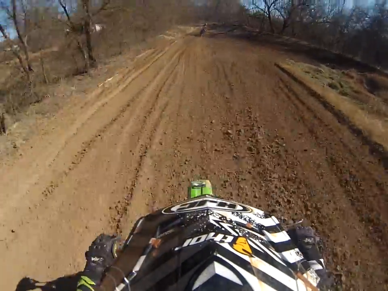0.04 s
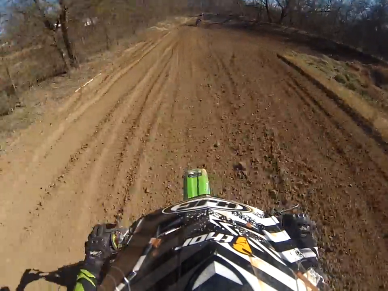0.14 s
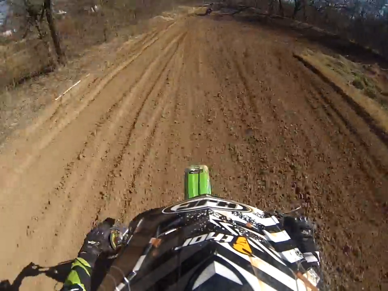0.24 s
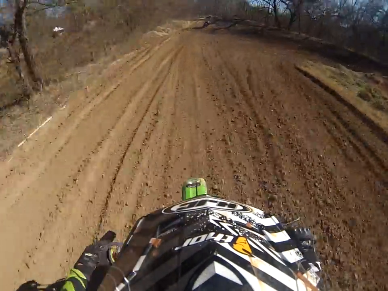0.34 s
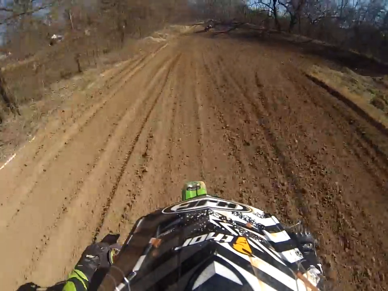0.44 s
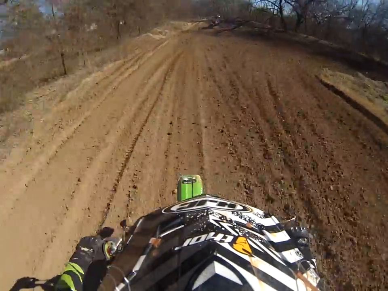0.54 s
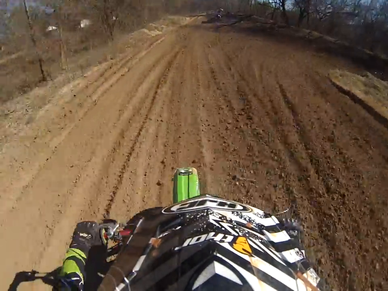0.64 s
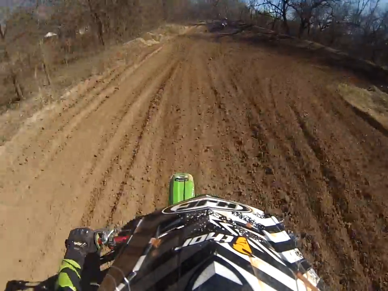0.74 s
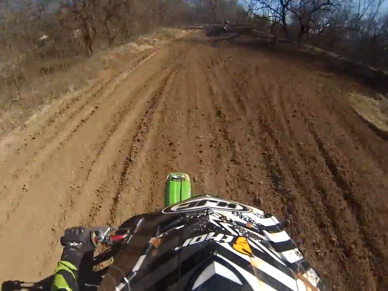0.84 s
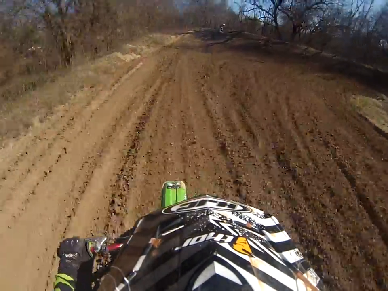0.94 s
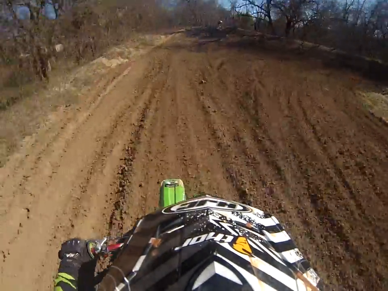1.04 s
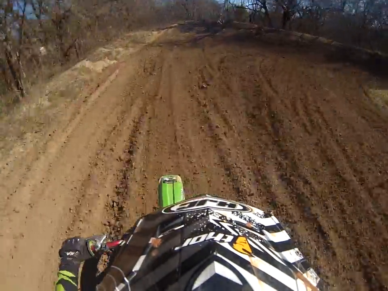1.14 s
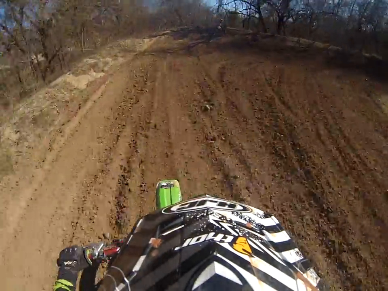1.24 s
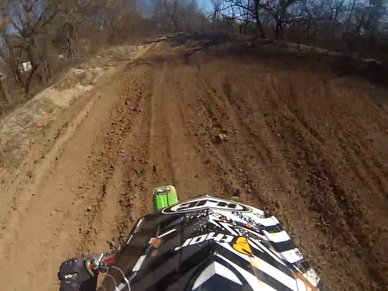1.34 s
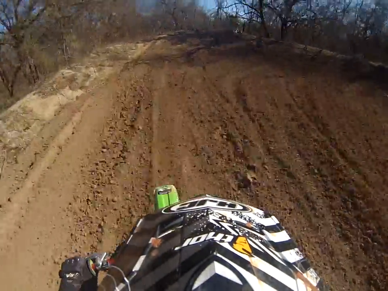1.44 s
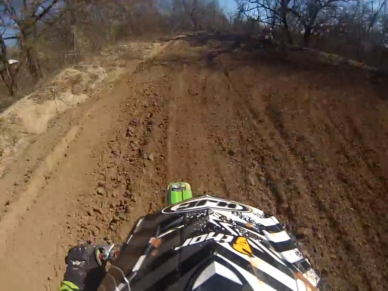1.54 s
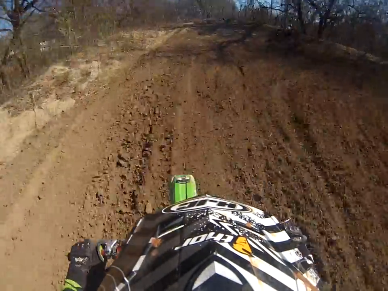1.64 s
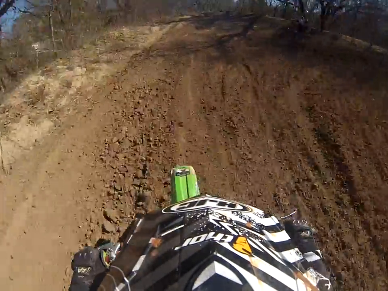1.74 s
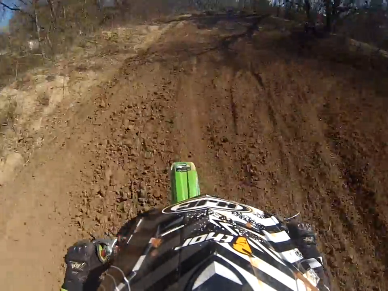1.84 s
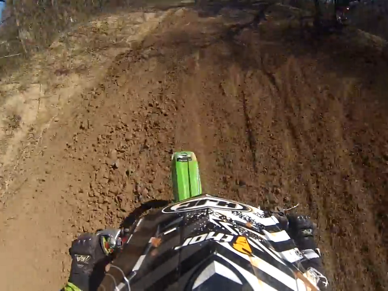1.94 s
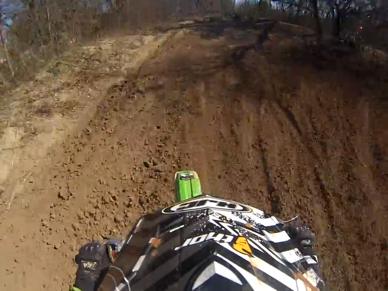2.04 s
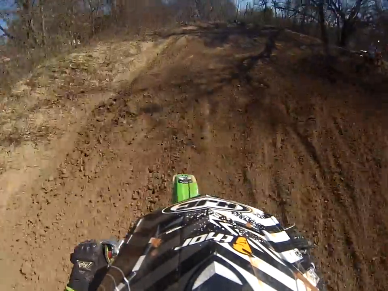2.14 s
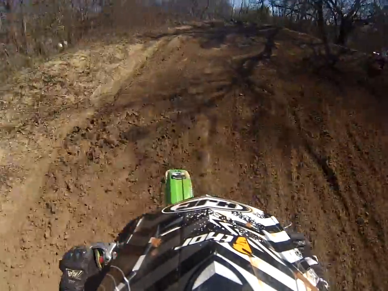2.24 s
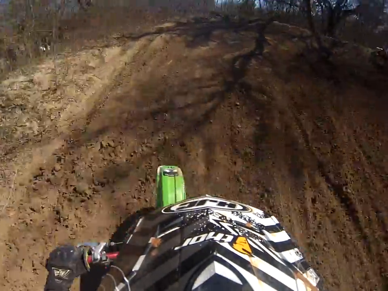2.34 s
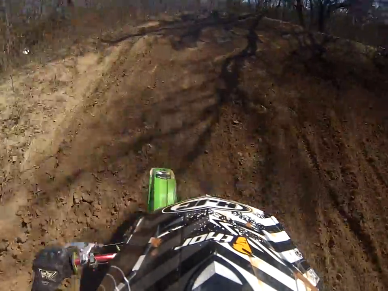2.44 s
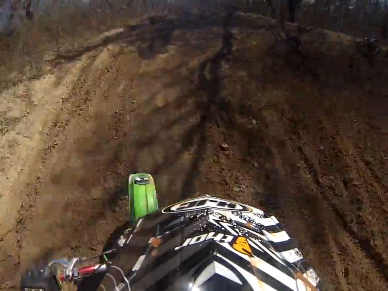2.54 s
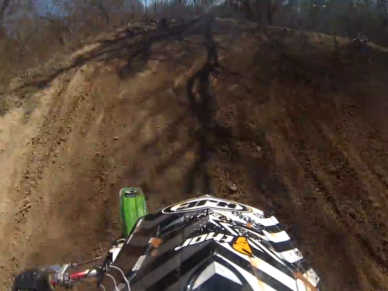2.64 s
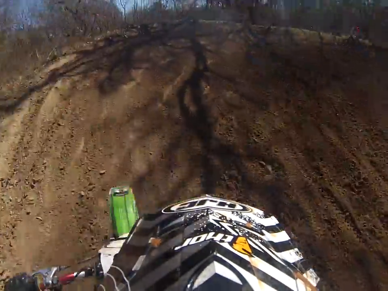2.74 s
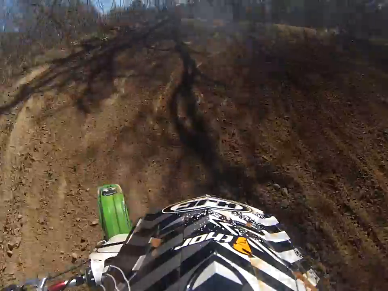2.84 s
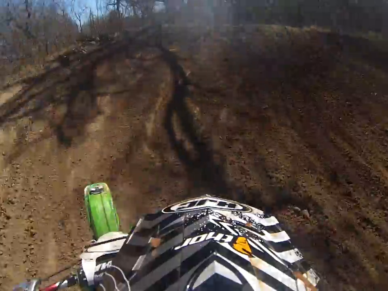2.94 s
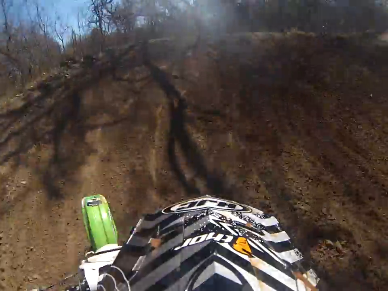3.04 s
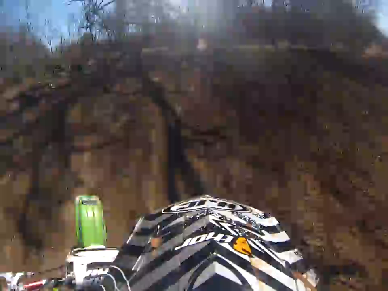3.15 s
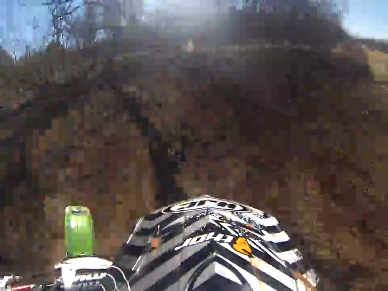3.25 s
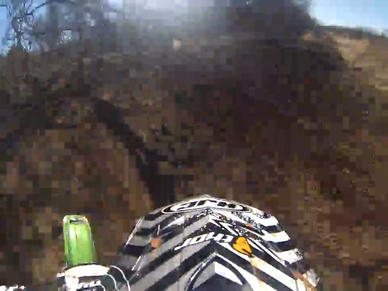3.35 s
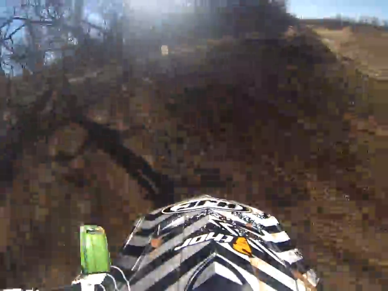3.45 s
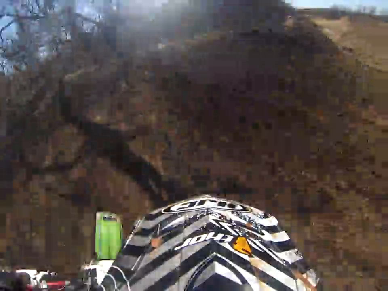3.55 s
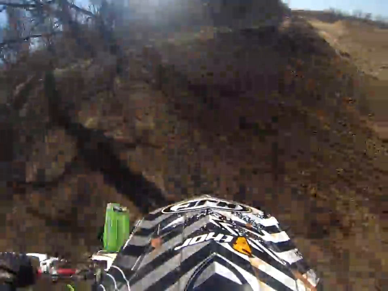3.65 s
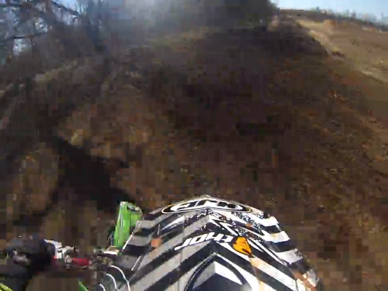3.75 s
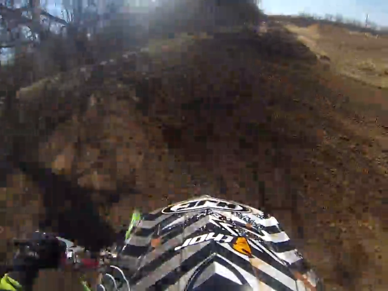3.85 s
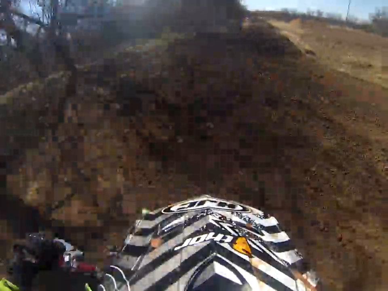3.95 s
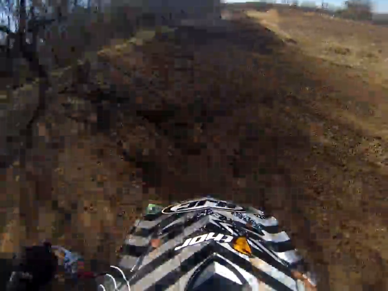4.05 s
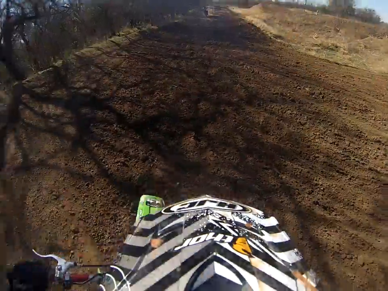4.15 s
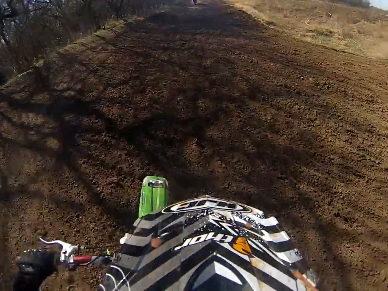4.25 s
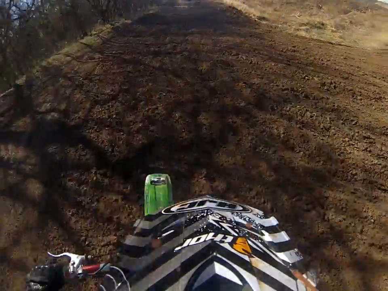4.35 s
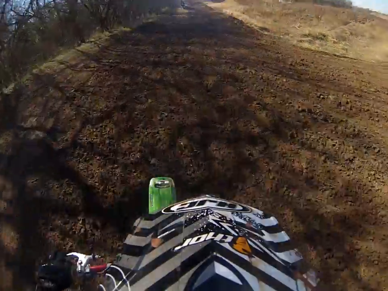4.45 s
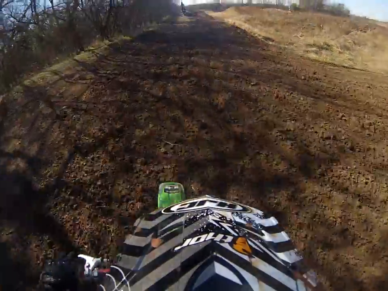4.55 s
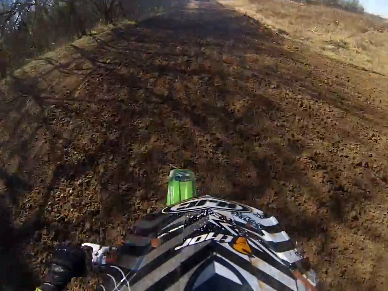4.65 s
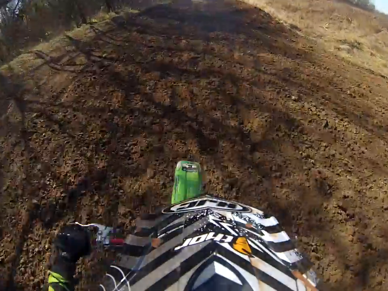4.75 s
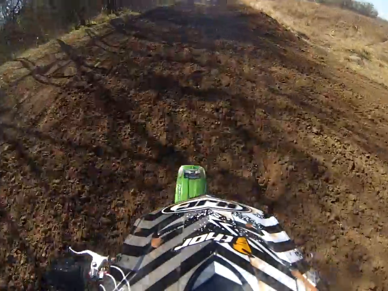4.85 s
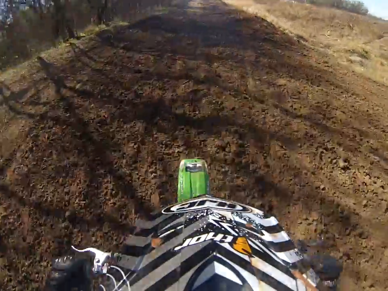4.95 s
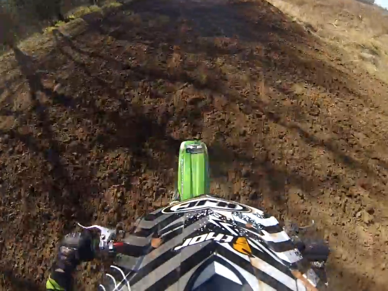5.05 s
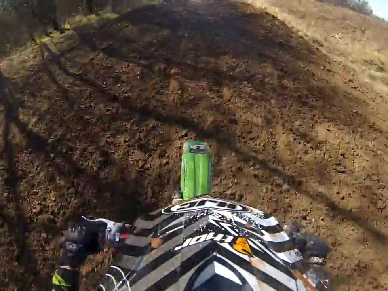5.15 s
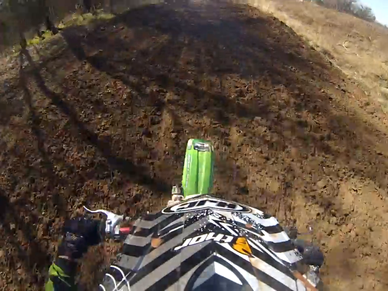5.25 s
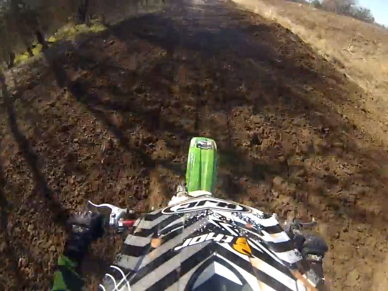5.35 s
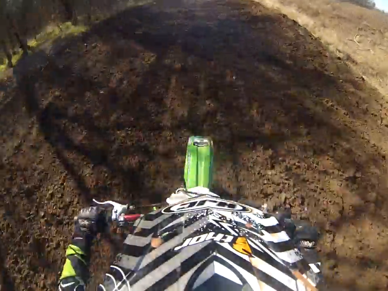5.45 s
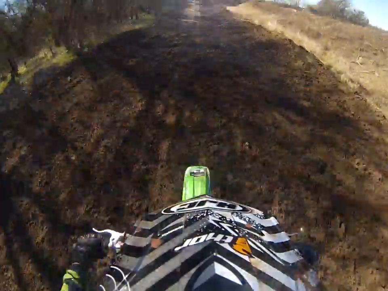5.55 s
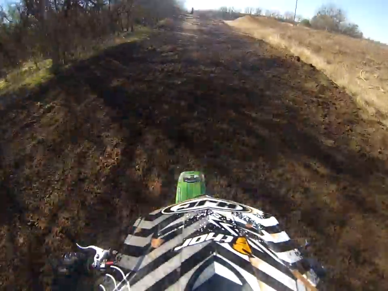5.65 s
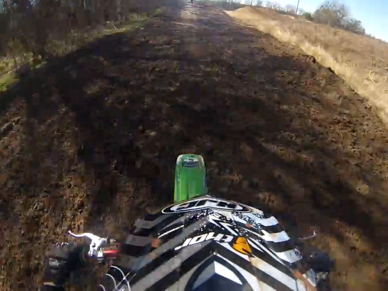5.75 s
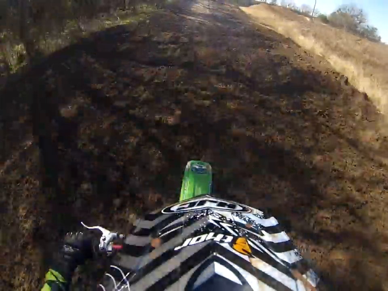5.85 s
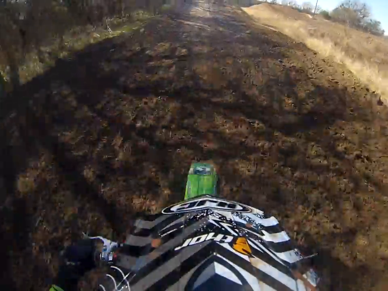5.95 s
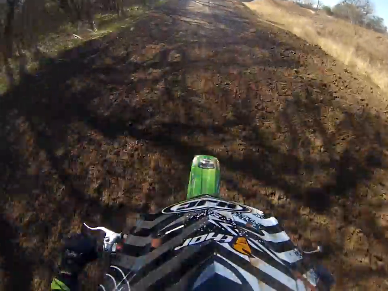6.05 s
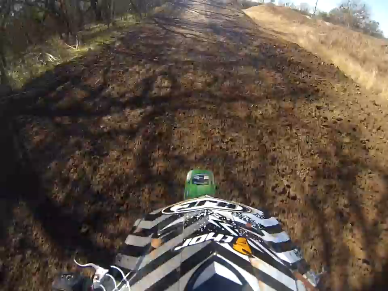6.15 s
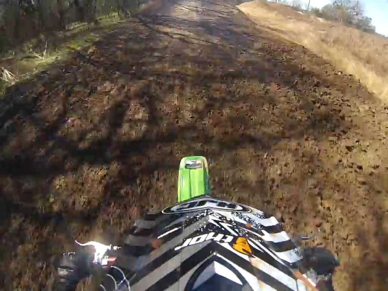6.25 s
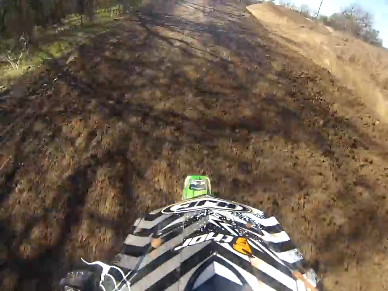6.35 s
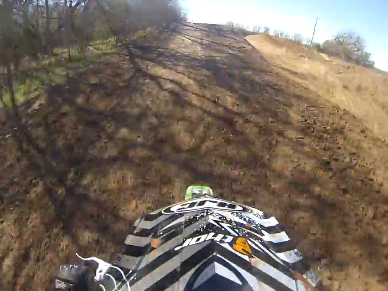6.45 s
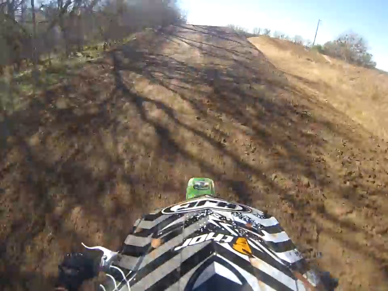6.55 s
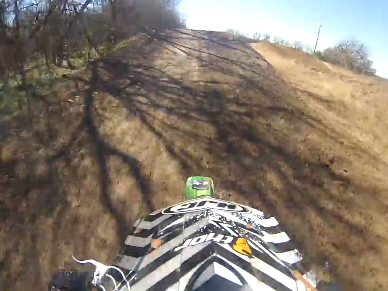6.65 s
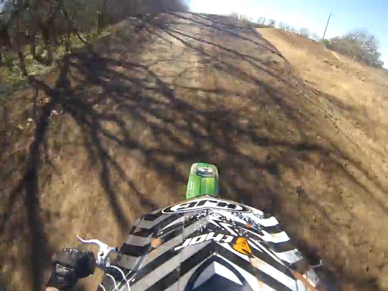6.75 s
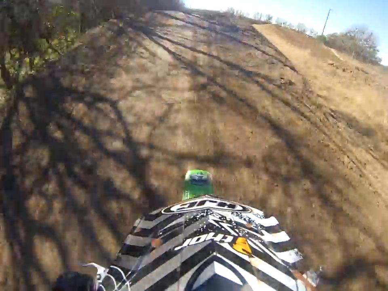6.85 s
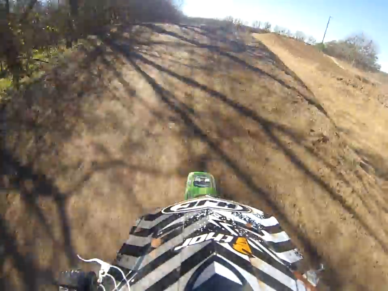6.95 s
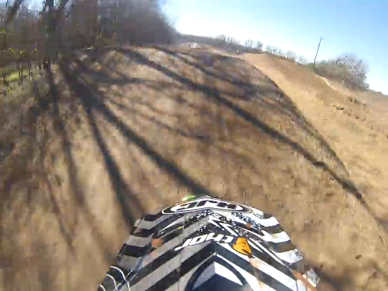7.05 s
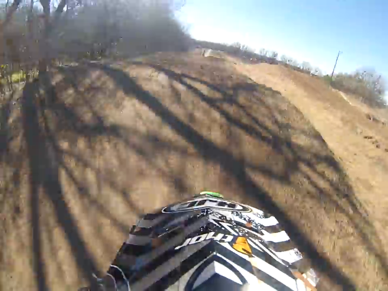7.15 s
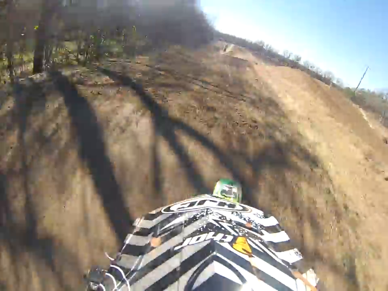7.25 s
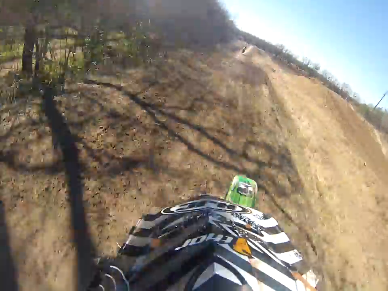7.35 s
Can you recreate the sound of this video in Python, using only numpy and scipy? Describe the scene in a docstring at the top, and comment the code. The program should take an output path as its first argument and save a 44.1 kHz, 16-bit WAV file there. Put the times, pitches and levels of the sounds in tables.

```python
"""Two-stroke motocross bike at the helmet

A rider hears the bike coast into a turn with three throttle blips, lug round it and come on the pipe;
the revs then flare over bumps as the rear wheel slips. Pulses and puffs of noise, one each crank turn,
excite resonances of the exhaust and the engine's metal. Filtered noise makes the wind on the microphone
and the hiss of air and tyres; blunt pushes and a damped sway make the bumps that jolt the mount, with
a brief crackle of overload. A brief, faint ring near 4.6 kHz is narrow-band noise."""
import sys
import numpy as np
from scipy import signal
from scipy.fft import rfft, irfft
from scipy.io import wavfile
from scipy.ndimage import uniform_filter1d, minimum_filter1d

SR = 44100
rng = np.random.default_rng(int(sys.argv[2]) if len(sys.argv) > 2 else 0)


def inscribe(sig):
    """Save sig as 16-bit PCM at rate SR to the path in sys.argv[1].

    A 1-D sig is mono; a 2-D sig holds one channel per row.
    Samples are clipped to [-1, 1] before scaling.
    """
    pcm = np.round(np.clip(np.atleast_2d(sig).T, -1, 1) * 32767)
    wavfile.write(sys.argv[1], SR, pcm.astype(np.int16))


N = 325883
TIME = np.arange(N) / SR  # seconds
TAPS = 16384  # filter length, samples
FREQS = np.maximum(np.arange(TAPS // 2 + 1) * SR / TAPS, 1)  # Hz
TOP_HZ = 15500  # upper limit of the sound

# Wind buffeting before its gusts: start_s, level_db
WIND_BUFFETING = [(0, -15.5), (.47, -21), (.57, -30), (.66, -15.5), (1.25, -22.5), (2.0, -22.5), (2.8, -23),
                  (3.08, -28), (3.25, -29.5), (3.52, -30.5), (3.66, -29), (4.05, -31), (4.38, -18),
                  (5.15, -24.5), (6.15, -13.5), (6.33, -17.5), (6.95, -20), (7.39, -17.5)]
# Spectrum of the buffeting: pitch_hz, level_db
BUFFETING_SPECTRUM = [(12, -5), (22, 3), (32, -6), (39, -10), (44, 3), (49, -3), (56, -16), (68, -21.5),
                      (82, -27.5), (110, -35.5), (160, -39.5), (300, -57), (700, -80)]
# Air past the helmet: start_s, air_and_tyre_rush_db, eddy_db
HELMET_AIRFLOW = [(0, -33, -34.5), (.6, -37.5, -38.5), (1.1, -38, -34), (1.6, -42, -44), (2.6, -41.5, -53),
                  (3.3, -52, -55), (4.5, -42, -81), (5.8, -39, -42.5), (7.39, -37, -43)]
# Spectrum of the air and tyre rush: pitch_hz, level_db
RUSH_SPECTRUM = [(75, -5), (130, 0), (170, 6), (240, 0), (330, -1.5), (560, -6), (820, -3), (970, -6.5),
                 (1270, 2), (1950, 1.5), (2400, -1), (2850, -11.5), (3800, -14.5), (6000, -26.5),
                 (15000, -55)]
# Bumps that jolt the helmet, and the overload crackle with each:
# peak_s, thump_db, crackle_db (before a common lift), sway (share of the push)
BUMPS = [(1.112, 3.5, -29.5, 0.36), (1.193, 8, -30, 0.47), (1.36, 2, -39, 0.15), (1.674, 2, -34.5, .2),
         (2.001, 1, -40, 0.16), (2.469, -2, -43, 0.16), (2.629, -4.5, -44, 0.18), (2.877, -3, -39, 0.062),
         (3.034, -2.5, -41.5, 0.13), (3.635, -6.5, -49, 0.25), (4.609, 1, -52, .1), (5.889, -2, -23.5, .15),
         (5.974, 6, -30, 1), (6.749, -1, -26, .15), (7.09, -2, -26, .15), (7.3, 1.5, -42, 0.18)]

# Crank speed in the lower gear while the tyre grips, one firing a turn: start_s, crank_hz
LOW_GEAR_SPEED = [(3.902, 74.44), (3.97, 90.5), (4.146, 95), (4.272, 89), (4.552, 94.4), (4.73, 111.5),
                  (4.772, 125), (4.862, 166.3), (5.09, 173.4), (5.15, 192.4), (5.27, 195.5), (5.354, 191),
                  (5.452, 202.5), (5.565, 212), (5.68, 208.9), (5.846, 191.3), (5.964, 181.6)]
# Crank speed in the higher gear while the tyre grips: start_s, crank_hz
HIGH_GEAR_SPEED = [(6.009, 149), (6.156, 158.6), (6.267, 143.1), (6.31, 156.5), (6.612, 166.6),
                   (6.864, 176.7), (7.033, 178.9), (7.14, 194.3), (7.39, 182.2)]
# Rear wheel slips that let the revs flare: peak_s, rise_hz, build_up_s
WHEEL_SLIPS = [(4.046, 37.2, 0.087), (4.215, 8.2, 0.068), (4.335, 6, .05), (4.508, 10.1, 0.064),
               (4.681, 12.2, 0.065), (4.845, 29, 0.057), (4.919, 29.2, 0.046), (5.051, 7.6, 0.023),
               (5.313, 19.5, 0.046), (5.434, 9.2, .06), (5.534, 12.7, 0.063), (5.614, 10.6, 0.042),
               (5.735, 17.6, 0.051), (5.914, 34.3, 0.07), (6.042, 16, 0.035), (6.223, 40.5, 0.063),
               (6.418, 64, 0.13), (6.516, 16.6, 0.057), (6.584, 21.3, 0.045), (6.687, 21.8, .03),
               (6.819, 14.5, 0.047), (6.932, 37.6, .068), (6.995, 19, .03), (7.096, 32.5, .063),
               (7.212, 9, 0.0205)]
# Throttle on the way into the turn, a trailing, nearly shut throttle and then three short blips:
# start_s, length_s, crank_reached_hz, opening (0-1)
APPROACH_THROTTLE = [(-.08, 0.76, 115.4, 0.06), (1.435, .12, 106.7, 0.49), (2.135, .165, 139.8, 0.59),
                     (3.385, .152, 101, 0.44)]
# Throttle on the way out of the turn: start_s, opening (0-1)
EXIT_THROTTLE = [(3.89, 0.01), (3.98, 0.7), (4.05, 0.95), (4.12, 0.7), (4.7, 0.7), (4.82, 0.79),
                 (5.05, 0.99), (5.885, 0.92), (5.92, 0.39), (6.04, 0.6), (6.27, 0.89), (6.42, 0.38),
                 (6.56, 0.91), (6.8, 0.47), (6.96, 0.76), (7.07, 0.88), (7.15, 0.51), (7.39, 0.54)]
# Off the throttle the crank sinks towards idle with this time constant
START_HZ, IDLE_HZ, COAST_S = 116.8, 27.13, .94
OPENING_ATTACK_S, OPENING_RELEASE_S = 0.087, 0.035
GRIP_S = .042  # time for the tyre to bite again
# Roughness (0-1): at cruising revs, its drop per octave of revs, its extra at half throttle
ROUGH_CRUISE, ROUGH_PER_OCTAVE, ROUGH_PART_THROTTLE = 0.3213, .16, 0.17

# Expansion chamber under power: pitch_hz, width_hz, level_db
CHAMBER_MODES = [(205, 80, 0), (285, 90, -8), (385, 150, -14), (530, 110, -25), (700, 110, -21),
                 (860, 110, -24)]
# Same chamber pumping air with the throttle shut: pitch_hz, width_hz, level_db
PUMPING_MODES = [(121, 32, -3), (243.4, 144, 6), (370, 160, -13.5), (529, 212, -6)]
# Silencer under power: pitch_hz, width_hz, level_db
SILENCER_MODES = [(494, 80, -14.5), (709.7, 60.5, 1), (856.5, 56, -3), (1050, 144, -6), (1175.5, 105, 4),
                  (1254, 130, -2), (1422, 272, 1.5), (1612, 107, 4.5)]
# Cylinder and cases knocked by the piston: pitch_hz, width_hz, level_db
CYLINDER_MODES = [(437, 203, -18.5), (734, 48, -9), (875, 53, -12.5), (1167, 113, -3.5), (1302, 51, -4.5),
                  (1558, 154, -2), (1673.5, 99, 1.5)]
# Resonance that screams at full throttle: pitch_hz, width_hz, level_db
SCREAM_MODE = [(1580, 140, 0)]
# Upper resonances of the exhaust: pitch_hz, width_hz, level_db
HOWL_MODES = [(1963, 62, 4.5), (2144, 156, 7.5), (2276, 220, 3), (2520, 85, -2)]
# Thin metal and gas jet under power: pitch_hz, width_hz, level_db
METAL_MODES = [(2686, 1600, 3), (3593, 105, 5.5), (3750, 170, -10), (4740, 216, 5), (5270, 370, 1),
               (6220, 1150, -7.5), (6950, 610, -2), (7650, 2500, -9), (9660, 2000, -13), (11330, 970, -9),
               (12500, 2900, -20)]
# Chain and gears when coasting: pitch_hz, width_hz, level_db
CLATTER_MODES = [(2960, 405, -0.5), (3580, 180, 4), (3870, 230, 0), (4770, 210, -4.5), (5030, 700, -7.5),
                 (6470, 2700, -12), (7660, 840, -14.5), (10600, 4300, -24)]
# Lower and upper mode of the thin metal that sings: pitch_hz, width_hz, level_db
SINGING_MODES = [(3040, 45, 0), (5030, 55, 0)]
# Moments when those modes sing out: peak_s, lower_lift_db, upper_lift_db
SINGING_MOMENTS = [(4.83, -7, 11.5), (5.32, -5, 9.5), (5.39, 2, 2), (5.6, 0, 6.5), (5.73, 8, -8),
                   (5.88, 4, 0), (6.98, 15, -9), (7.12, 5, -6)]
ZING_SWELL_S = .04

# Level of each voice at the helmet, at cruising revs:
# shut_db, open_db, shut_slope_db_per_octave, open_slope_db_per_octave, resonant_hz, lift_db
BOOM_LAW = (-52, -15.5, 13.5, -19.5, 212.5, 18)
BARK_LAW = (-39, -27, 6.5, 5.5, 180, 8.5)
HOWL_LAW = (-45.5, -39, 12.5, 10, 170.5, 7.5)
RASP_LAW = (-56.5, -40.5, 10.5, 9.5, 157.5, 5)
CRUISE_HZ, RESONANT_WIDTH_HZ = 96.1, 32.7  # cruising revs; reach of the lift around resonant_hz


def undb(db):
    """Amplitude ratio: converts decibels to gain."""
    return 10 ** (np.asarray(db) / 20)


def curves(table):
    """Linear interpolation: each column of a timed table, sample by sample."""
    s, *columns = np.transpose(table)
    return [np.interp(TIME, s, column) for column in columns]


def steady(x, span=0.077):
    """Level normalisation: holds the short-term rms near 1 and keeps the faster flutter (span in s)."""
    size = max(int(span * SR), 2)
    power = uniform_filter1d(x * x, size)
    power = uniform_filter1d(power, size)
    return x / np.sqrt(np.maximum(power, 1e-18))


def shape(x, gain):
    """Minimum-phase filtering: a causal response with the given gain at FREQS."""
    # folding the cepstrum onto positive time makes the response causal
    cepstrum = irfft(np.log(gain + 1e-7))
    cepstrum[1:TAPS // 2] *= 2
    cepstrum[TAPS // 2 + 1:] = 0
    response = irfft(np.exp(rfft(cepstrum)))
    return signal.fftconvolve(x, response)[:N]


def ring(x, modes):
    """Resonance: a bank of steep-sided modes, summed in power, filters the excitation."""
    power = 0
    for hz, width, db in modes:
        detuning = (FREQS - hz * hz / FREQS) / width
        power = power + undb(db) ** 2 / (1 + detuning ** 2) ** 2
    return shape(x, np.sqrt(power))


def noise(spectrum):
    """Spectral shaping: white noise filtered through points of pitch_hz, level_db."""
    hz, db = np.transpose(spectrum)
    gain = undb(np.interp(np.log(FREQS), np.log(hz), db))
    return shape(rng.standard_normal(N), gain)


def walk(rate):
    """Slow random modulation: smoothed random steps, rate per second, with a spread of 1."""
    size = int(SR / rate)
    steps = np.repeat(rng.standard_normal(N // size + 1), size)[:N]
    wander = uniform_filter1d(steps, size)
    return wander / wander.std()


def clicks(times, sizes):
    """Band-limited impulses: windowed sinc kernels placed between samples."""
    at = times[:, None] * SR
    index = at.astype(int) + np.arange(-7, 9)
    kernel = np.sinc(index - at) * np.sinc((index - at) / 8)
    return np.bincount(np.clip(index, 0, N - 1).ravel(), (sizes[:, None] * kernel).ravel(), N)


def wind(gust_db=3.5):
    """Turbulence: gusts rumble on the microphone, eddies flutter, air and knobbly tyres hiss above."""
    rush_db, eddy_db = curves(HELMET_AIRFLOW)
    buffet_db = curves(WIND_BUFFETING)[0] + gust_db * walk(38)
    rumble = steady(noise(BUFFETING_SPECTRUM), span=0.1) * undb(buffet_db)
    eddies = ring(rng.standard_normal(N), [(87, 35, 0)])
    flutter = steady(eddies, span=0.051) * undb(eddy_db)
    rush = steady(noise(RUSH_SPECTRUM), span=.2) * undb(rush_db + 1.2 * walk(25))
    return rumble + flutter + rush


def jolts(push_s=0.0072, mount_hz=44, decay_s=0.18, crackle_s=0.004, crackle_lift_db=3):
    """Damped oscillation: a blunt push, then the mount sways; a brief crackle of overload comes with it."""
    thumps, crackle_level = np.zeros(N), np.zeros(N)
    for s, thump_db, crackle_db, sway in BUMPS:
        near = np.abs(TIME - s) < .4
        t = TIME[near] - s
        push = np.exp(-np.sqrt(t * t + 1e-6) / push_s)
        # the sway rises fast before the peak and dies away slowly after it
        envelope = np.exp(-np.abs(t) / np.where(t > 0, decay_s, .012))
        swing = np.cos(2 * np.pi * mount_hz * t) * envelope
        thumps[near] += undb(thump_db) * (push + sway * swing) / (1 + sway)
        crackle_level[near] += undb(crackle_db + crackle_lift_db) * np.exp(-(t / crackle_s) ** 2)
    crackle = noise([(300, 15), (2000, 8), (6000, -2), (15000, -13)])
    return thumps + crackle_level * steady(crackle, span=.2)


def faint_ring(at_s=2.12, length_s=0.05, hz=4625, db=-54):
    """Narrow-band resonance: a brief, faint ring, probably metal excited by the engine."""
    tone = steady(ring(rng.standard_normal(N), [(hz, 25, 0)]))
    return tone * undb(db) * np.exp(-((TIME - at_s) / length_s) ** 4)


def crank_speed():
    """Rotational inertia: each opening drives the crank, which then runs down; in gear, slips flare it."""
    hz = np.full(N, float(START_HZ))
    for s, length, reached_hz, _ in APPROACH_THROTTLE:
        before = np.interp(s, TIME, hz)
        driven = before + (reached_hz - before) * (TIME - s) / length
        coasting = IDLE_HZ + (reached_hz - IDLE_HZ) * np.exp(-(TIME - s - length) / COAST_S)
        onward = np.where(TIME < s + length, driven, coasting)
        hz = np.where(TIME < s, hz, onward)
    flares = sum(rise * np.interp(TIME, [s - build, s, s + GRIP_S], [0, 1, 0])
                 for s, rise, build in WHEEL_SLIPS)
    in_gear = curves(LOW_GEAR_SPEED + HIGH_GEAR_SPEED)[0] + flares
    return np.where(TIME < LOW_GEAR_SPEED[0][0], hz, in_gear)


def throttle_opening(lead_s=0.023):
    """Gas admission: a trailing throttle, then blips just ahead of the revs, then the drive out."""
    throttle = curves(EXIT_THROTTLE)[0]
    for s, length, _, opening in APPROACH_THROTTLE:
        rise = (TIME - s + lead_s) / OPENING_ATTACK_S
        fall = (s + length + lead_s - TIME) / OPENING_RELEASE_S
        throttle = throttle + opening * np.clip(np.minimum(rise, fall), 0, 1)
    return np.clip(throttle, .01, .99)


def roughness(hz, throttle):
    """Scavenging: a two-stroke fires unevenly at low revs and part throttle, and cleans up on the pipe."""
    octaves = np.log2(hz / CRUISE_HZ)
    part_throttle = np.sin(np.pi * throttle)
    rough = ROUGH_CRUISE - ROUGH_PER_OCTAVE * octaves + ROUGH_PART_THROTTLE * part_throttle
    return np.clip(rough, .2, .8)


def firings(turns, rough, jitter_ms, scatter_db, gas, puff_turns):
    """Pulse excitation: a pulse each turn and a noise puff after it, scattered by rough running."""
    count = np.arange(int(turns[-1]) + 1)
    times = np.interp(count, turns, TIME)
    uneven = np.interp(times, TIME, rough)
    late, strong = rng.standard_normal((len(count), 2)).T
    # a badly scavenged cylinder tends to alternate strong and weak burns
    sizes = undb(uneven * scatter_db * (strong + 0.089 * (-1) ** count))
    pulses = clicks(times + uneven * late * jitter_ms / 1000, sizes)
    puff_decay = np.exp(-(turns % 1) / puff_turns)
    puffs = rng.standard_normal(N) * sizes[turns.astype(int)] * puff_decay
    return steady(pulses) + gas * rough * steady(puffs)


def smear(x, lags=(23, 41, 67)):
    """All-pass dispersion: short pipe reflections (lags in samples) spread pulses without colouring."""
    for lag in lags:
        loop = np.r_[1, np.zeros(lag - 1), -.55]
        x = signal.lfilter(loop[::-1], loop, x)
    return x


def reflect(x, ground_ms=7.3, ground=0.47, body_ms=2.123, body=0.69, sway_ms=.13):
    """Interference: track and body reflect the engine; as the rider bobs, harmonics swell and fade."""
    out = x
    for lag_ms, gain in ((ground_ms, ground), (body_ms, body)):
        lag = (lag_ms + sway_ms * walk(7)) / 1000
        out = out + gain * np.interp(TIME - lag, TIME, x)
    return out


def by_throttle(drive, throttle, open_modes, shut_modes):
    """Power crossfade: the exhaust colours the sound under power, the shut-throttle modes otherwise."""
    powered = steady(ring(drive, open_modes))
    coasting = steady(ring(drive, shut_modes))
    return np.sqrt(throttle) * powered + np.sqrt(1 - throttle) * coasting


def loudness(law, hz, throttle):
    """Resonant gain: level follows throttle and revs, with a lift under power near resonant revs."""
    shut_db, open_db, shut_slope, open_slope, resonant_hz, lift_db = law
    octaves = np.log2(hz / CRUISE_HZ)
    shut = (1 - throttle) * (shut_db + shut_slope * octaves)
    powered = throttle * (open_db + open_slope * octaves)
    lift = lift_db * throttle ** 2 * np.exp(-((hz - resonant_hz) / RESONANT_WIDTH_HZ) ** 2)
    return undb(shut + powered + lift)


def zing(drive, hz, throttle, lower_db=-38, upper_db=-42, from_hz=135, full_hz=205):
    """Modal vibration: thin metal rings at high revs, and now and then one of its modes sings out."""
    effort = throttle * np.clip((hz - from_hz) / (full_hz - from_hz), 0, 1)
    lifts = sum(np.outer(lift_db, np.exp(-((TIME - s) / ZING_SWELL_S) ** 2))
                for s, *lift_db in SINGING_MOMENTS)
    singing = 0
    for mode, db, lift in zip(SINGING_MODES, (lower_db, upper_db), lifts):
        singing = singing + steady(ring(drive, [mode]), span=0.097) * undb(db + lift)
    return effort * singing


def engine(tuned_hz=195, tuned_width_hz=45, tuned_gain=0.47, scream_gain=2.22):
    """Source and filter: firings boom in the chamber, bark and howl in the exhaust, rasp in thin metal."""
    hz, throttle = crank_speed(), throttle_opening()
    rough = roughness(hz, throttle)
    turns = np.cumsum(hz * (1 + .0045 * rough * walk(45))) / SR
    # the higher the band, the more of its drive is turbulent gas
    slugs = firings(turns, rough, jitter_ms=.1, scatter_db=2.2, gas=.4, puff_turns=.6)
    blows = smear(firings(turns, rough, jitter_ms=.055, scatter_db=3, gas=1.15, puff_turns=1.1))
    gusts = firings(turns, rough, jitter_ms=.05, scatter_db=3.5, gas=1.8, puff_turns=.9)
    jet = firings(turns, rough, jitter_ms=.03, scatter_db=3, gas=5, puff_turns=1.2)
    # near its tuned speed the chamber's main wave builds up and outweighs the others
    on_pipe = tuned_gain * np.exp(-((hz - tuned_hz) / tuned_width_hz) ** 2)
    slugs = smear(slugs, lags=(61, 103))
    main_wave = steady(ring(slugs, CHAMBER_MODES[:1]))
    boom = by_throttle(slugs, throttle, CHAMBER_MODES, PUMPING_MODES) + on_pipe * main_wave
    # at full throttle one harmonic after another is held by the pipe's strongest resonance
    scream = scream_gain * throttle ** 5 * steady(ring(blows, SCREAM_MODE), span=.012)
    # the silencer only drowns the cylinder's knock once enough gas flows
    flow = throttle * np.minimum(hz / tuned_hz, 1)
    reflected_blows = reflect(blows, ground=0.38, body=0.68)
    bark = by_throttle(reflected_blows, flow, SILENCER_MODES, CYLINDER_MODES) + scream
    howl = ring(reflect(gusts), HOWL_MODES)
    rasp = by_throttle(reflect(smear(jet)), throttle, METAL_MODES, CLATTER_MODES)
    mix = zing(gusts, hz, throttle)
    for voice, law in [(boom, BOOM_LAW), (bark, BARK_LAW), (howl, HOWL_LAW), (rasp, RASP_LAW)]:
        mix = mix + steady(voice, span=0.099) * loudness(law, hz, throttle)
    return mix


def scene():
    """Superposition: all layers are summed, the same in both ears."""
    mono = wind() + jolts() + faint_ring() + engine()
    return np.array([mono, mono])


def limiter(x, ceiling_db=-7.0, hold_s=0.038, recover_db_per_s=85, ahead_s=0.0053, ease_s=0.0048):
    """Gain reduction: bass peaks over the ceiling duck the whole sound; the gain holds, then creeps back."""
    bass = signal.sosfiltfilt(signal.butter(2, 130, fs=SR, output="sos"), x[0])
    over_db = np.maximum(20 * np.log10(np.abs(bass) + 1e-9) - ceiling_db, 0)
    # a running maximum holds each peak, shifted to act slightly ahead of it
    held = -minimum_filter1d(-over_db, max(int(hold_s * SR), 1))
    held = np.interp(TIME - hold_s / 2 + ahead_s, TIME, held)
    recovery = recover_db_per_s * TIME
    duck_db = np.maximum.accumulate(held + recovery) - recovery
    return x * undb(-uniform_filter1d(duck_db, max(int(ease_s * SR), 1)))


def record(dry):
    """Band limits and saturation: ducks thumps, blocks steady pressure, rounds peaks and cuts the top."""
    passed = signal.sosfilt(signal.butter(1, 3, "high", fs=SR, output="sos"), limiter(dry))
    rounded = passed / (1 + (passed / .85) ** 6) ** (1 / 6)
    return signal.sosfilt(signal.ellip(10, .1, 80, TOP_HZ, fs=SR, output="sos"), rounded)


dry = scene()
out = record(dry)
inscribe(out)
```